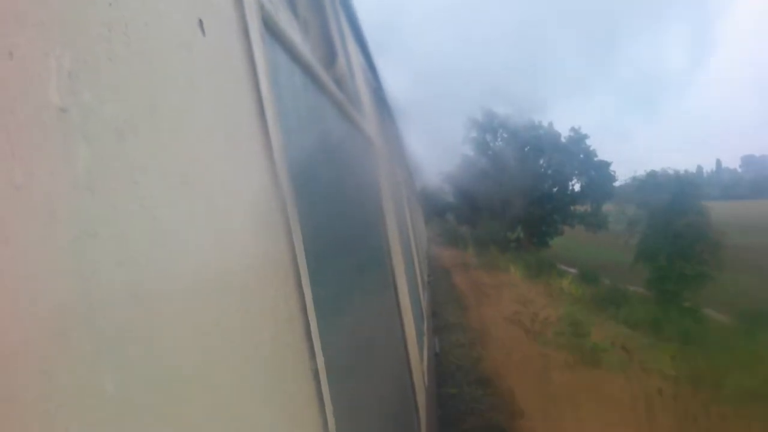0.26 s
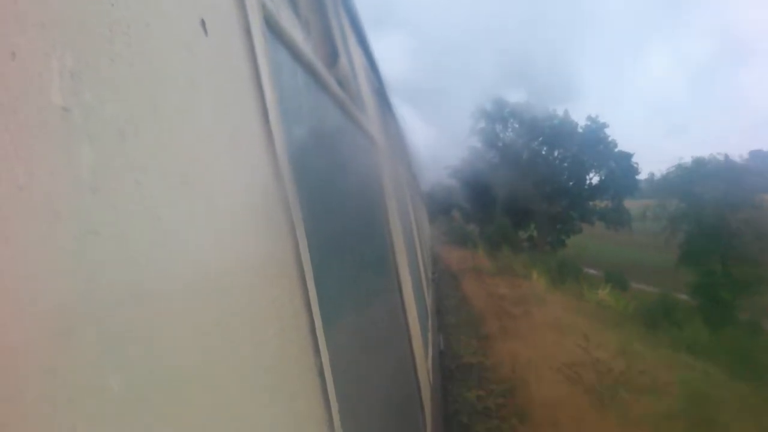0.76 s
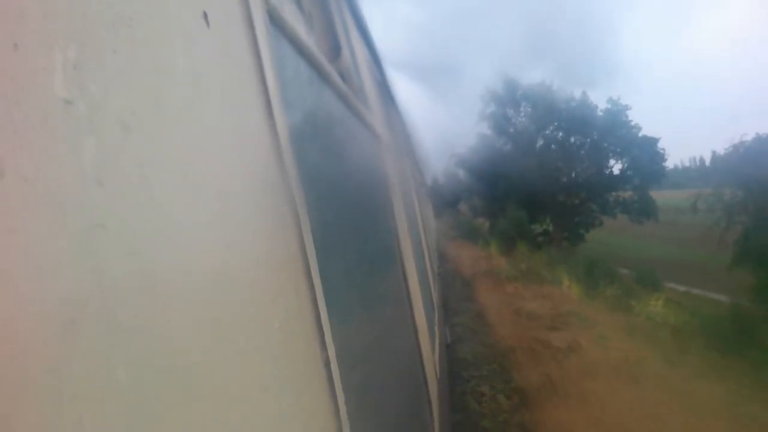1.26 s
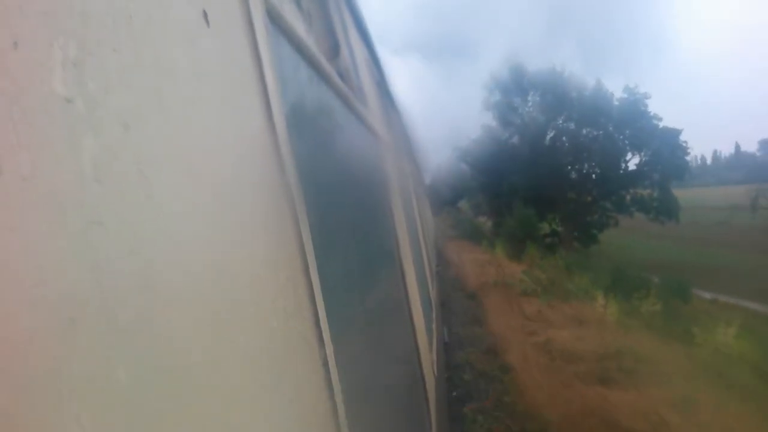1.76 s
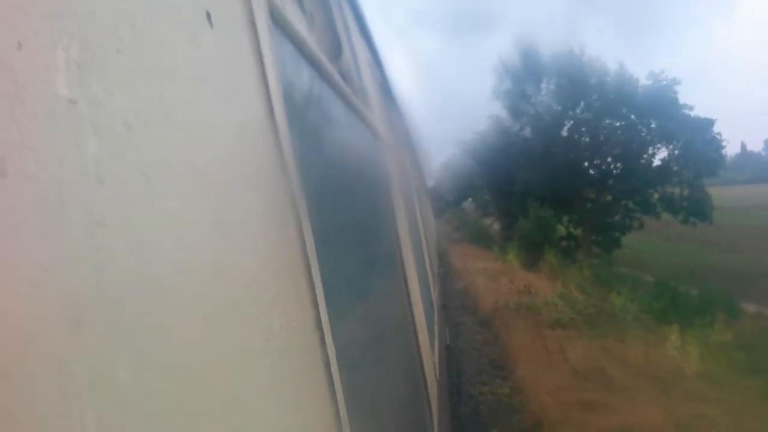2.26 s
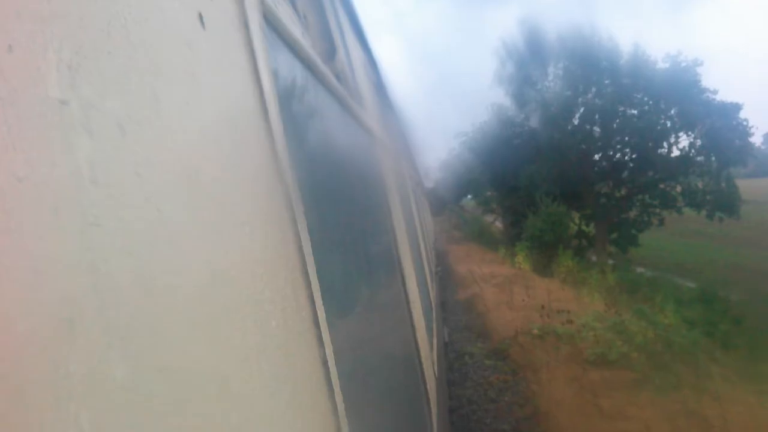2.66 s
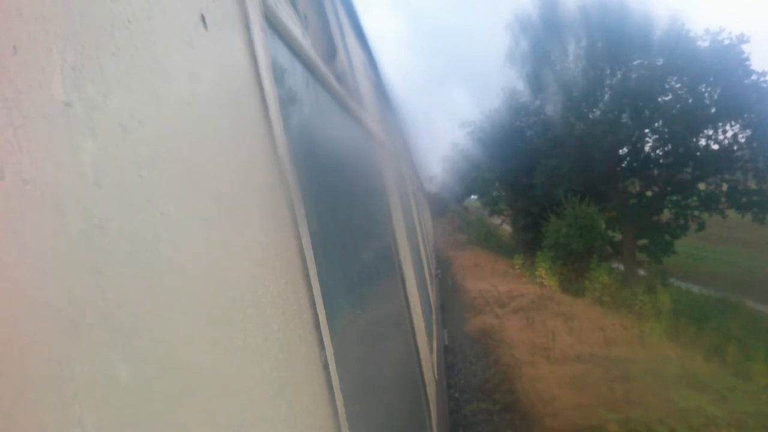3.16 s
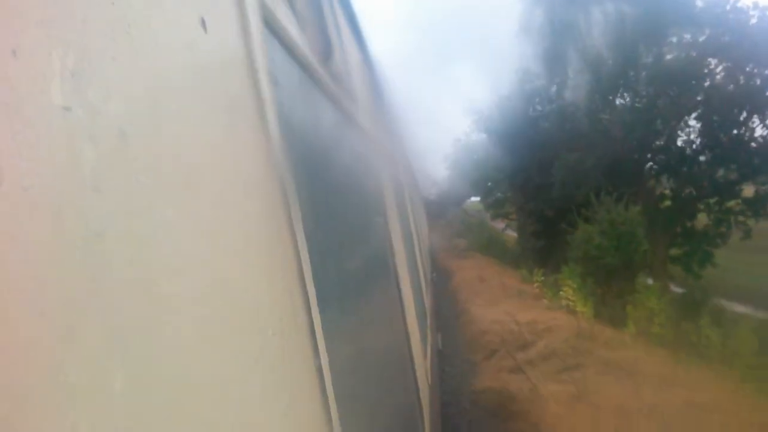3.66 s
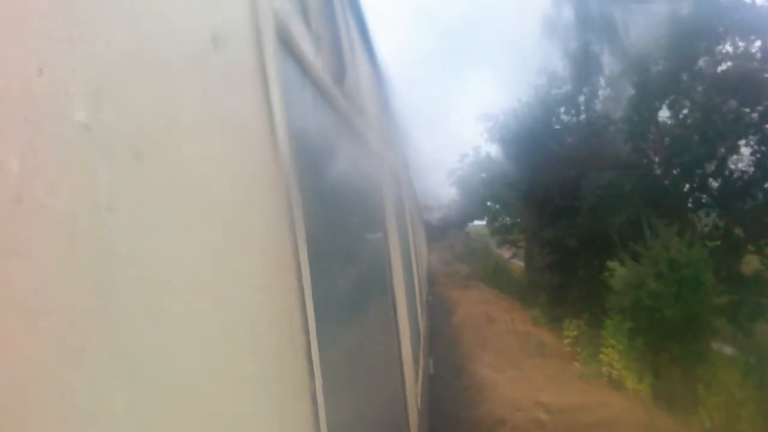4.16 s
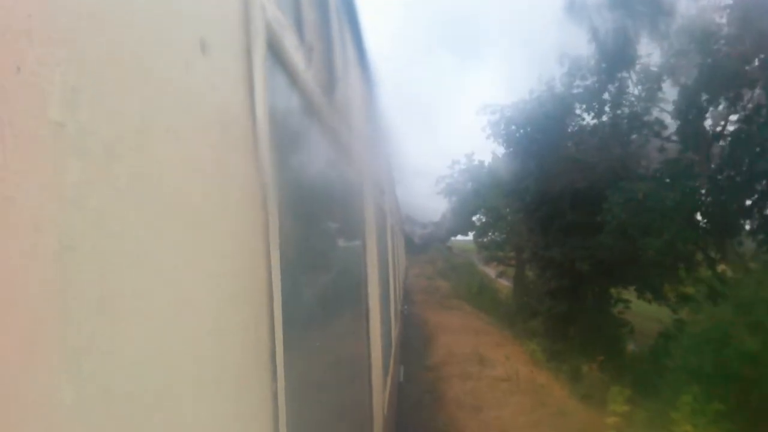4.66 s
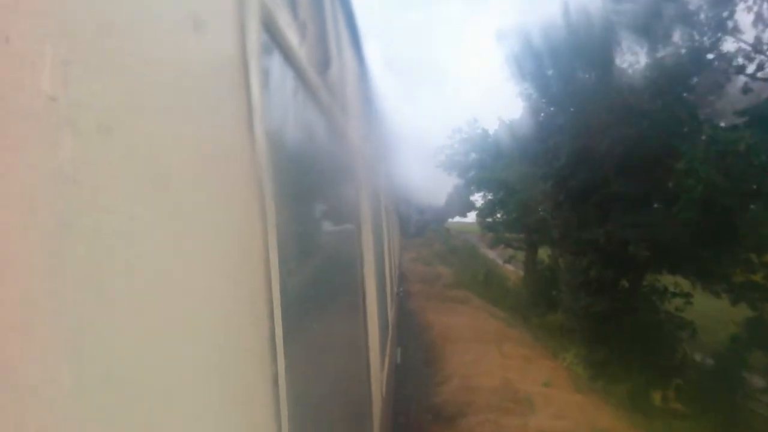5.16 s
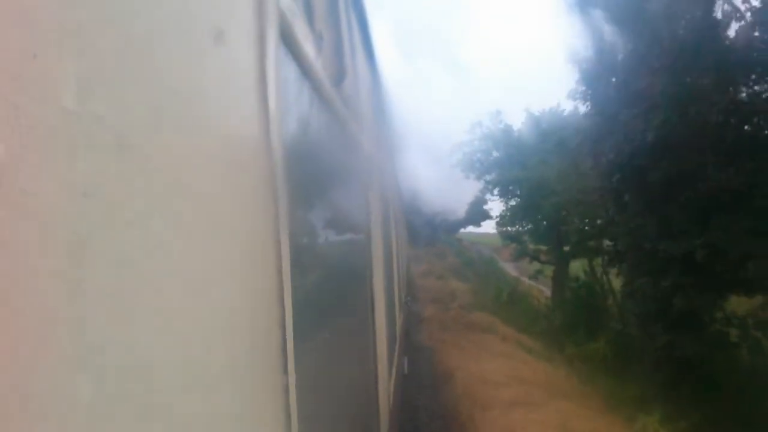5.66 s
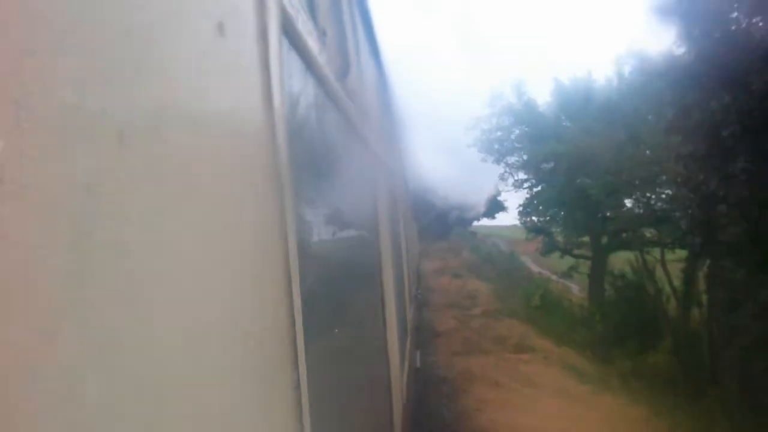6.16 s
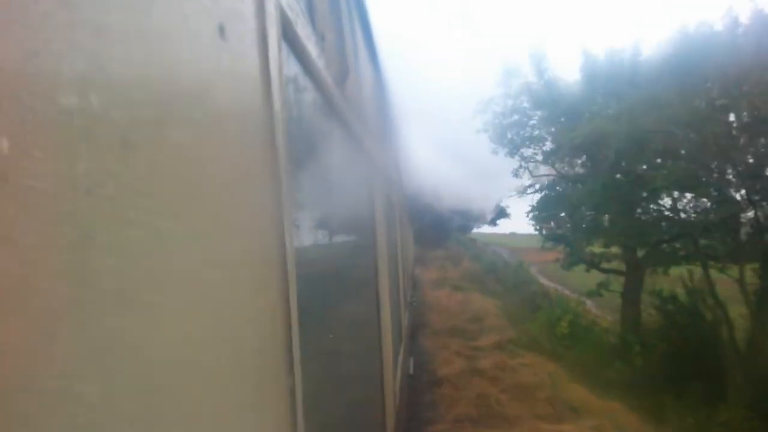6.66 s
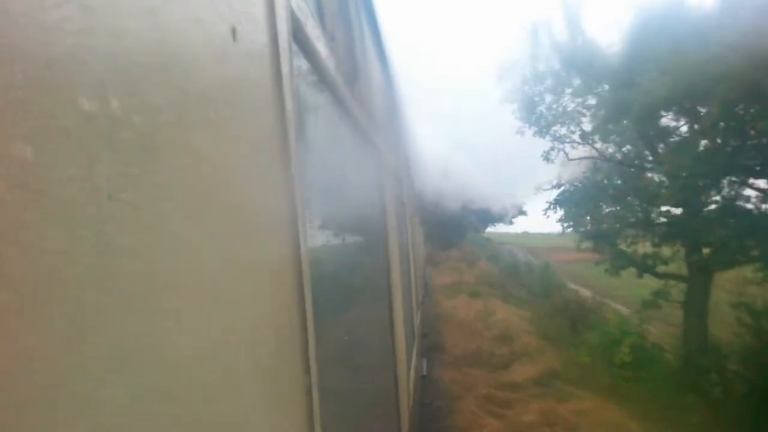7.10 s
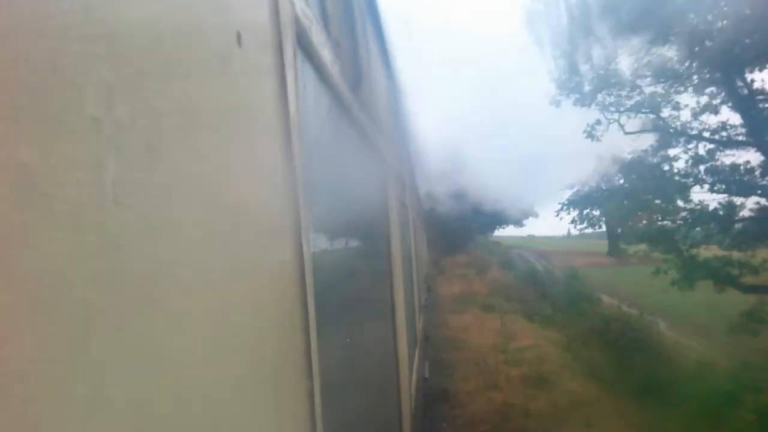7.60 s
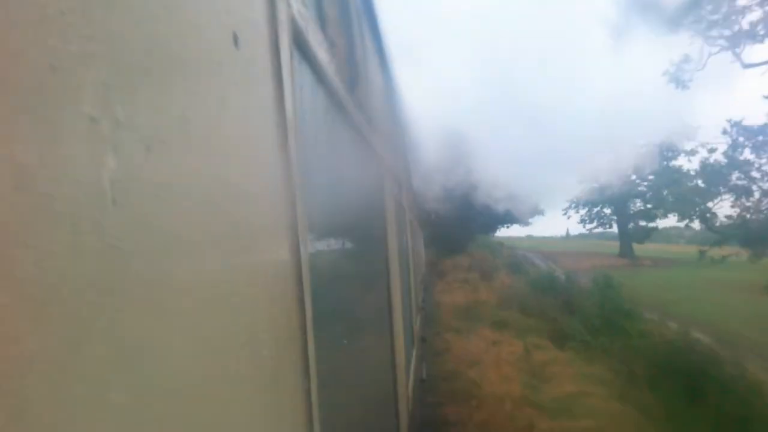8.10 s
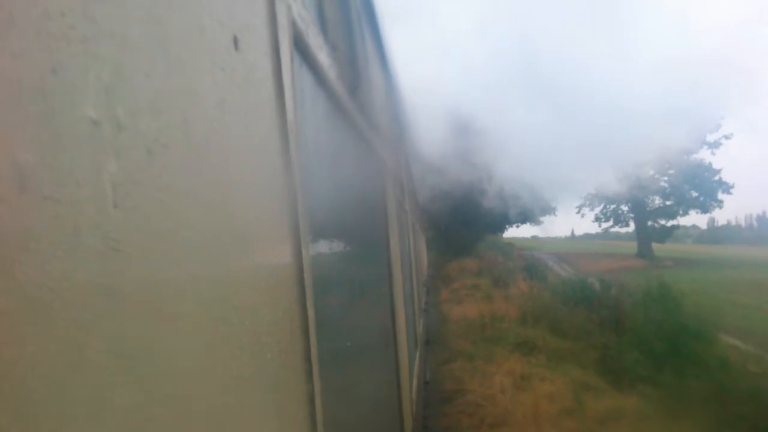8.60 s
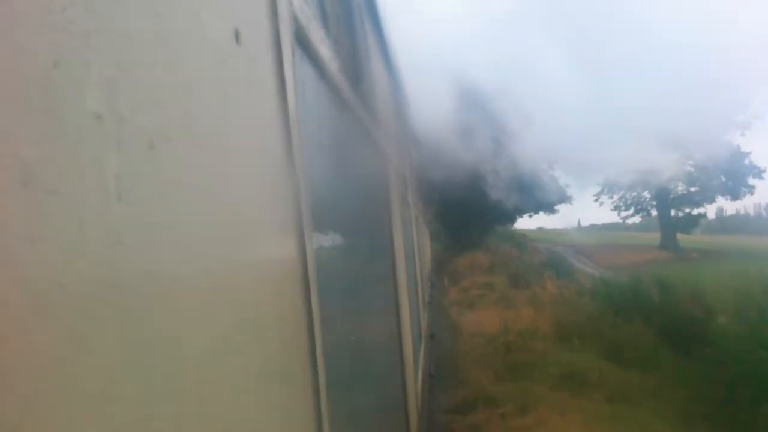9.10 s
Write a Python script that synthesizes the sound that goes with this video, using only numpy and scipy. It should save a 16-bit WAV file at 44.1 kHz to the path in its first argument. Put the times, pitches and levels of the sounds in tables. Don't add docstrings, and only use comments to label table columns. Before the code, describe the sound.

Loud distorted slipstream roar beside a moving steam train, deep thumps and a wavering low hum chopped by fast puffs, ending in a hard gust.

```python
import sys
import numpy as np
from scipy import signal
from scipy.fft import rfft, irfft, next_fast_len
from scipy.io import wavfile
from scipy.ndimage import uniform_filter1d

SR = 44100
rng = np.random.default_rng(int(sys.argv[2]) if len(sys.argv) > 2 else 0)


def amplitude_ratio(level_db):
    exponent = np.asarray(level_db, float) / 20
    return 10 ** exponent


def bounce(signal):
    frames = np.transpose(np.atleast_2d(signal))
    limited = np.clip(frames, -1, 1)
    pcm = np.round(limited * 32767).astype(np.int16)
    wavfile.write(sys.argv[1], SR, pcm)


N = 411894


def rms_one(x):
    return x / np.sqrt(np.mean(x ** 2) + 1e-20)


def in_time(rows):
    s, *columns = np.transpose(rows)
    return [np.interp(np.arange(N) / SR, s, c) for c in columns]


def lowpass(x, hz, order):
    return signal.sosfilt(signal.butter(order, hz, fs=SR, output="sos"), x)


def drift(rate_hz):
    return rms_one(lowpass(rng.standard_normal(N + SR), rate_hz, order=2)[SR:])


def turbulence(bands, patchy_db, patch_hz):
    out = 0
    for low_hz, high_hz, level_db in bands:
        band_pass = signal.butter(2, [low_hz, high_hz], "band", fs=SR, output="sos")
        band = signal.sosfilt(band_pass, rng.standard_normal(N + SR))[SR:]
        out = out + rms_one(band) * amplitude_ratio(level_db + patchy_db * drift(patch_hz))
    return rms_one(out)


def steadied(x, share, window_s):
    size = int(window_s * SR)
    power = uniform_filter1d(uniform_filter1d(x ** 2, size), size)
    return rms_one(x / (power + 0.054) ** (share / 2))


def bell(t, length_ms):
    squareness = 4.5
    return np.exp(-np.log(2) * np.abs(t / (length_ms / 2000)) ** squareness)


def wheels():
    rolling = turbulence([(700, 1500, 0.0), (1500, 2800, -5.0)], patchy_db=3.0, patch_hz=15.0)
    return lowpass(amplitude_ratio(-43) * rolling, 3000, order=6)


# time in seconds, level in dB.
DRAUGHT_COURSE = [(0.0, -9.5), (0.5, -13), (1.0, -9.5), (1.45, -16.5), (2.2, -9.5), (2.8, -16.5),
                  (3.6, -7.5), (4.3, -9.5), (4.95, -17.5), (5.45, -9), (5.85, -13.5), (6.3, -13.5),
                  (6.8, -5.5), (7.45, -15.5), (7.85, -5), (8.3, -12.5), (8.6, -7.5), (9.2, -10.5)]
# low edge in Hz, high edge in Hz, level in dB.
BUFFET_EDDIES = [
    (4, 28, -1),
    (28.35, 63.4, 0.5),
    (64, 150, -3),
]


def port_buffeting(swell_db):
    draught_db, = in_time(DRAUGHT_COURSE)
    thumps = steadied(turbulence(BUFFET_EDDIES, patchy_db=1.5, patch_hz=4.4), share=0.34, window_s=0.03)
    return amplitude_ratio(draught_db + 1.0 + 0.13 * swell_db) * thumps


def edge_hum(hum_hz):
    width_hz = 72.8
    phase = 2 * np.pi * np.cumsum(hum_hz) / SR
    return rms_one(drift(width_hz / 2) * np.cos(phase) + drift(width_hz / 2) * np.sin(phase))


# low edge in Hz, high edge in Hz, level in dB.
ROAR_EDDIES = [
    (153.4, 228, -4.5),
    (303.6, 387.3, -2.5),
    (382.1, 468, -0.5),
    (453.2, 567, -2),
    (562, 676, -12.5),
]


def air_roar():
    return lowpass(turbulence(ROAR_EDDIES, patchy_db=2.0, patch_hz=7.1), 648, order=6)


# time in seconds, swell in dB, length in ms.
STRONG_PUFFS = [(0.079, 12.5, 17), (0.328, 7.5, 13), (1.14, 7.5, 36), (1.37, 5, 45), (1.542, 2.5, 23),
                (1.659, 2, 26), (1.739, 9, 12), (1.828, 17, 17), (2.076, 12, 25), (2.404, 11.5, 23),
                (2.447, 7.5, 6.4), (2.656, 8, 29), (3.549, 13, 24), (3.787, 10.5, 32), (4.113, 6, 29),
                (4.357, 5.5, 15), (5.039, 3.5, 37), (5.238, 6, 18), (5.474, 6.5, 29), (5.799, 5.5, 43),
                (6.353, 4.5, 17), (6.433, 7, 43), (6.763, 5.5, 22), (6.908, 10.5, 14), (7.135, 8.5, 21),
                (7.3, 2, 230), (8.097, 7, 7.9), (8.265, 6, 22), (8.87, 1.5, 180), (9.083, 3.5, 34)]
# time in seconds, swell in dB, length in ms.
FLOW_LULLS = [(0.239, -6, 60), (0.43, -5, 40), (0.491, -9, 18), (0.576, -10, 12), (0.85, -2.5, 170),
              (1.318, -6, 14), (1.47, -6, 48), (1.925, -5, 17), (2.055, -10, 22), (2.186, -6, 61),
              (2.31, -3.5, 66), (2.56, -2, 15), (2.615, -4, 32), (3.208, -5, 14), (3.451, -6.5, 34),
              (3.522, -11, 10), (3.745, -4.5, 54), (4.292, -5.5, 40), (1.6, -3, 49), (4.983, -2.5, 34),
              (5.091, -2, 28), (5.166, -4.5, 24), (5.396, -4.5, 65), (5.627, -9, 20), (5.67, -5.5, 58),
              (7.069, -2.5, 12), (7.499, -7, 26), (7.72, -2, 50), (8.309, -3, 23), (8.7, -1, 100)]


def exhaust_swells_db(pressure_db):
    beat_hz, beat_at_s, beat_ms = 8.92, 4.015, 34.7
    t = np.arange(N) / SR
    from_beat_s = (((t - beat_at_s) * beat_hz + 0.5) % 1 - 0.5) / beat_hz
    beat = bell(from_beat_s, beat_ms)
    beat_db = np.maximum(1.5 - 0.4 * pressure_db, 0)
    swell_db = beat_db * (beat - beat.mean())
    for s, puff_db, length_ms in STRONG_PUFFS + FLOW_LULLS:
        near = slice(max(int((s - 0.15) * SR), 0), int((s + 0.15) * SR))
        swell_db[near] += puff_db * bell(t[near] - s, length_ms)
    return swell_db


def slipstream(pressure_db, hum_db, hum_hz, swell_db):
    roar_db = -5.5 - 0.23 * pressure_db
    stream = amplitude_ratio(hum_db + 0.08) * edge_hum(hum_hz) + amplitude_ratio(roar_db - 0.54) * air_roar()
    stream_db = 10 * np.log10(amplitude_ratio(2 * hum_db) + amplitude_ratio(2 * roar_db))
    even = steadied(stream / amplitude_ratio(stream_db), share=0.61, window_s=0.016)
    flutter_db = 1.0 * drift(34.8)
    return amplitude_ratio(stream_db + 0.96 * swell_db + flutter_db) * even


# time in seconds, pressure in dB, edge hum share in dB, hum pitch in Hz.
WIND_COURSE = [(0.0, -4, -11.5, 260), (0.45, -2.5, -2, 290.1), (0.7, 1.5, -5.5, 286.7),
               (1.15, -4.5, -2, 275), (1.55, -1, -0.5, 254), (1.9, -3.5, -1, 252.2), (2.2, -3, -2.5, 259.5),
               (2.65, -7, -9, 289.6), (3.3, -6.5, -11, 283.6), (4.1, -3, -11, 282.5),
               (4.7, -4, -6.5, 287.3), (5.3, -3, -9.5, 283.8), (5.75, -2, -3, 254.9),
               (6.45, -4.5, -3.5, 247), (6.95, -2, -10, 270.2), (7.5, 0.5, -0.5, 289.2),
               (8.6, 2, -5.5, 272.7), (9.2, 10, -6, 289.7)]


def scene():
    pressure_db, hum_db, hum_hz = in_time(WIND_COURSE)
    swell_db = exhaust_swells_db(pressure_db)
    buffet = port_buffeting(swell_db)
    stream = slipstream(pressure_db, hum_db, hum_hz, swell_db)
    mix = buffet + amplitude_ratio(pressure_db) * (stream + wheels())
    return (amplitude_ratio(1.63) * mix)[None]


def low_pass(x):
    return signal.sosfilt(signal.butter(12, 15850, fs=SR, output="sos"), x)


def record(dry):
    top, sampling_hz = 0.72, 16000
    fade_out = np.minimum(np.arange(N)[::-1] / (0.002 * SR), 1)
    flat = np.clip(dry, -top, top) * fade_out - 0.005
    size = next_fast_len(N)
    hz = np.arange(size // 2 + 1) * SR / size
    cut = amplitude_ratio(-10.0) + (1 - amplitude_ratio(-9.5)) / (1 + (hz / 8000) ** 26.0)
    mids = signal.sosfilt(signal.butter(2, 1300, "high", fs=SR, output="sos"), flat)
    overload = uniform_filter1d(np.abs(dry), int(0.006 * SR))
    carrier = 2 * np.cos(2 * np.pi * sampling_hz * np.arange(N) / SR)
    mirror = amplitude_ratio(-46.5) * overload * mids * carrier
    sampled = irfft(rfft(flat, size) * cut, size)[:, :N] + mirror
    sampled = np.clip(sampled, -0.735, 0.725)
    return low_pass(sampled)


dry = scene()
out = record(dry)
bounce(out)
```